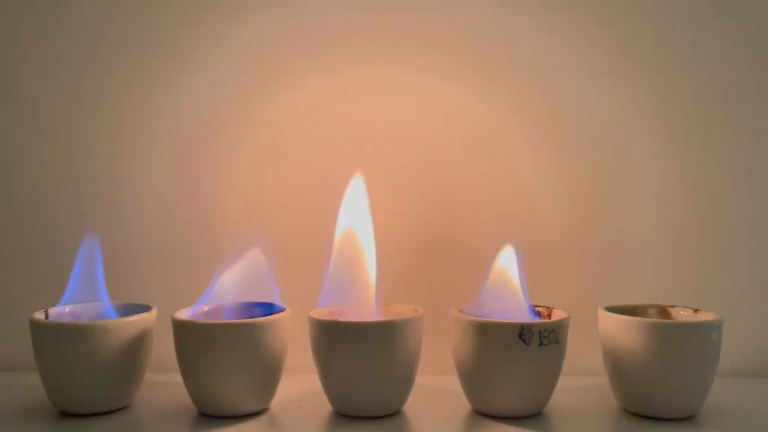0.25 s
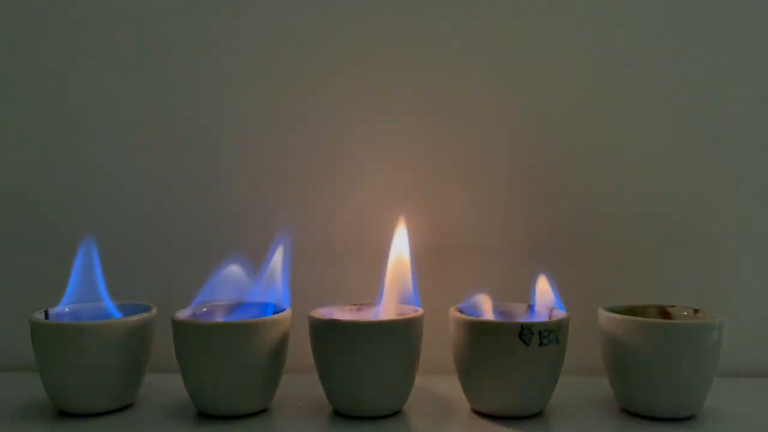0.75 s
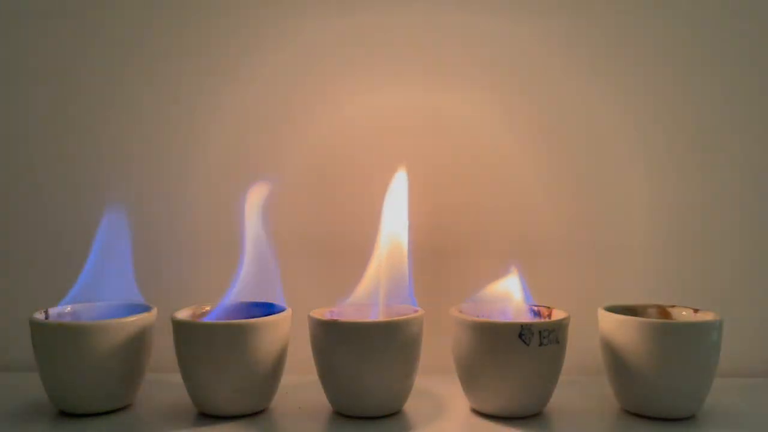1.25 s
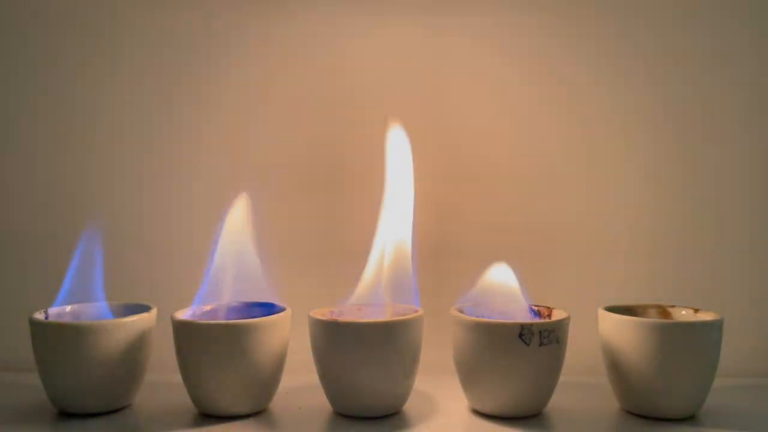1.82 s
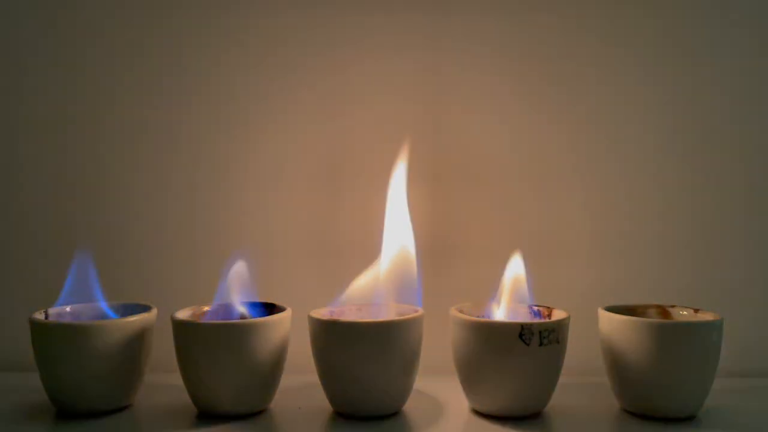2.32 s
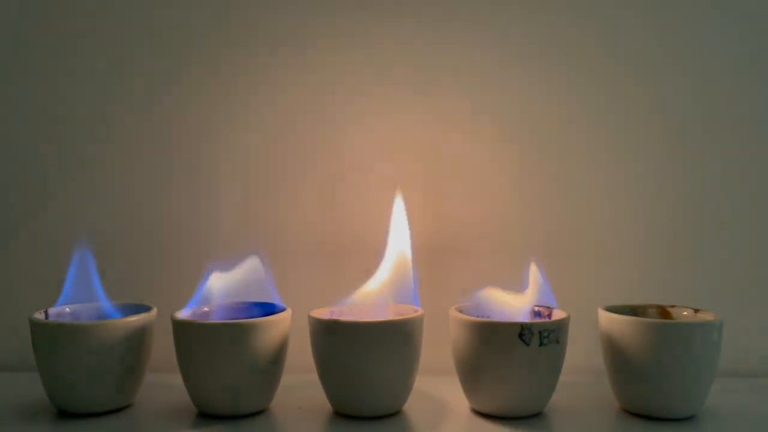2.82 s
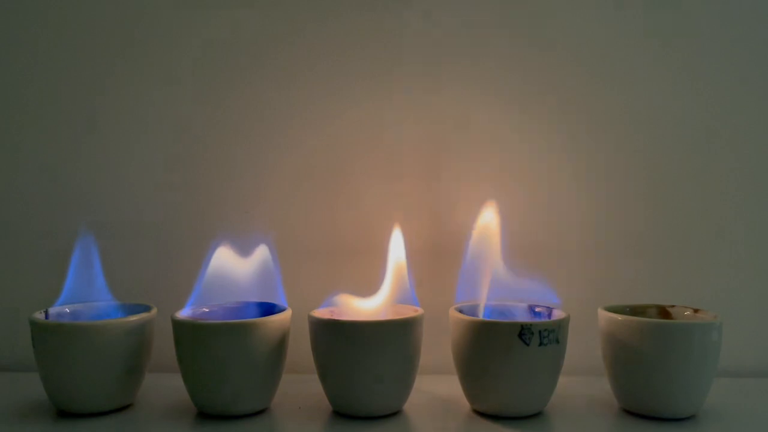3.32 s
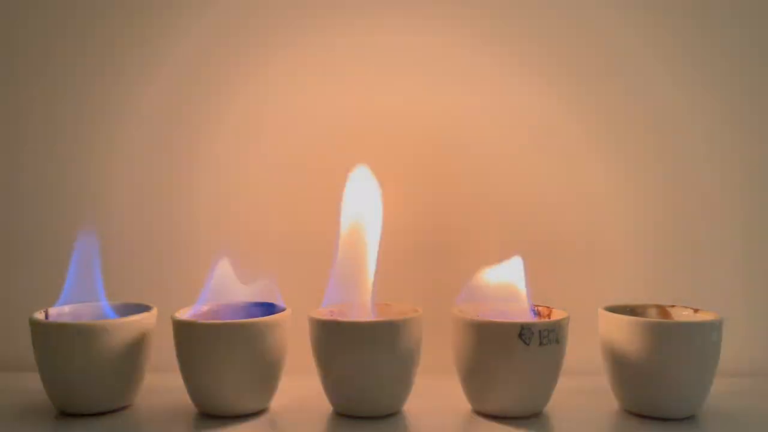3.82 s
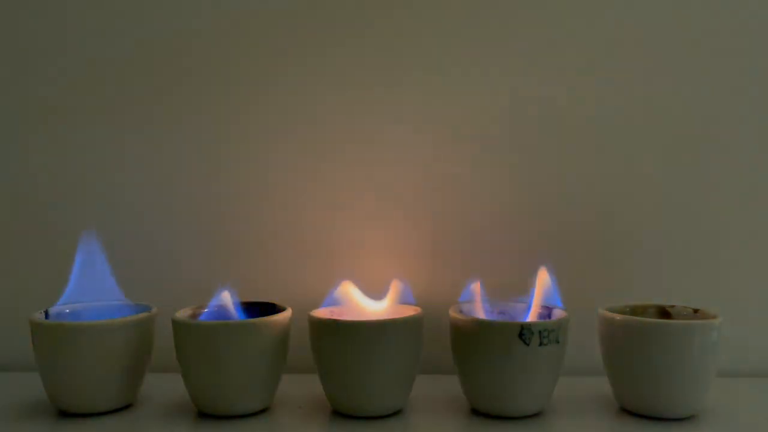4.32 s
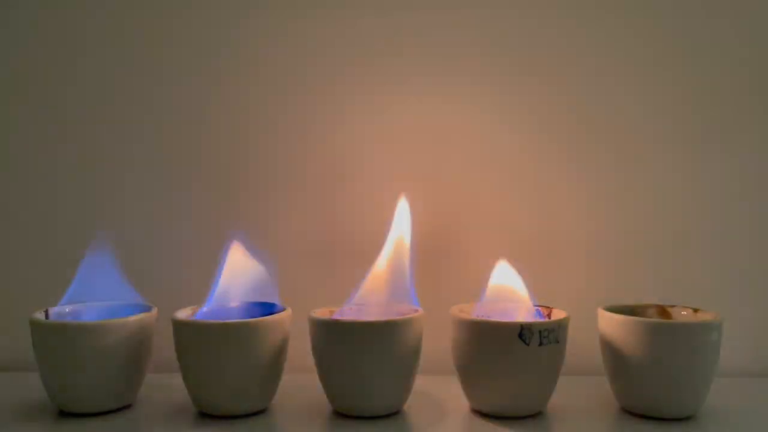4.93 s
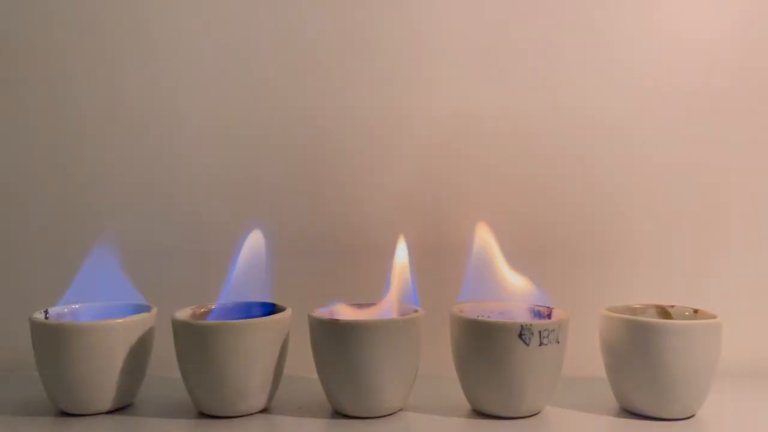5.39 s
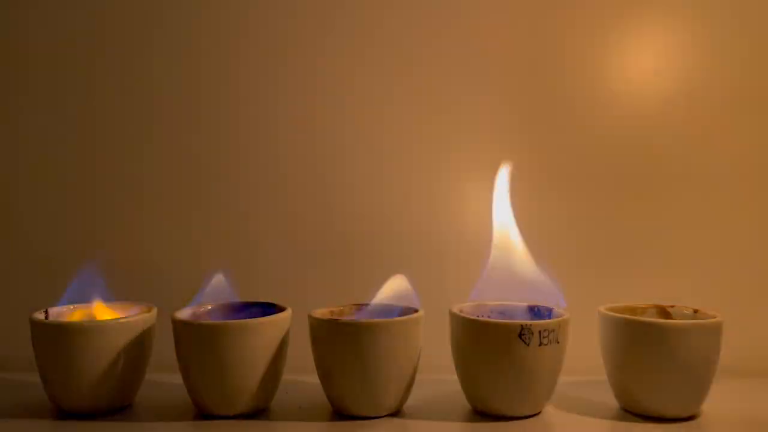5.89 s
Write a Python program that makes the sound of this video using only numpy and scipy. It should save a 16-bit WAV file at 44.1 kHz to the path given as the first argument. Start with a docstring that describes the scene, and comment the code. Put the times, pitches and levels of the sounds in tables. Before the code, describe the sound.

In a quiet lab with a deep steady fan hum, matchsticks rattle and tick in their box for about four seconds, busy at first, then gentler. The cardboard drawer rubs closed, its hollow tone falling. One very short scrape turns into a bright, explosive ignition, then a fine fading hiss with sputters and a soft flame rush. Light box clicks end it. Close stereo microphones, short room echo.

```python
"""In a room where ventilation hums, fingers rummage in a cardboard matchbox, a little to the right over a bench.
The sticks rustle and click: shaped noise rings the wood and the card. Then the drawer is pushed shut in fine jerks.
One match scrapes over the striker, catches with a sharp burst and flares for most of a second:
noise and random grains make its hiss, crackle and rush, and wavering tones over steady noise make the hum."""
import sys
import numpy as np
from scipy import signal
from scipy.fft import rfft, irfft, next_fast_len
from scipy.io import wavfile
from scipy.ndimage import uniform_filter1d, map_coordinates

SR = 44100
rng = np.random.default_rng(int(sys.argv[2]) if len(sys.argv) > 2 else 0)


def master_out(mix):
    """Clip the mix to full scale and print it as 16-bit PCM to the path in sys.argv[1]."""
    frames = np.transpose(np.atleast_2d(mix))
    ceiling = np.clip(frames, -1, 1)
    pcm = np.round(ceiling * 32767).astype(np.int16)
    wavfile.write(sys.argv[1], SR, pcm)


N = 271215
TIME_S = np.arange(N) / SR

# Levels in the tables are relative: the functions may add mixing gains.
# A t60 is the time a sound takes to fade by 60 dB.

# Sticks knocking on each other or on the box; hard knocks tick, soft ones ring the box:
# time_s, level_db, hardness_db
CLICKS = [(0.075, -46.5, -13), (0.163, -41, -9), (0.188, -38, -4), (0.197, -41, -1), (0.242, -45, 2),
          (0.2586, -41, -7), (0.314, -47, 10), (0.3238, -38, -4), (0.434, -41, 1), (0.545, -45.5, 2),
          (0.5572, -30, 5), (0.5734, -44, 12), (0.6674, -49.5, -4), (0.7191, -37, 0), (0.729, -41.5, 5),
          (0.7728, -49, -10), (0.8704, -44.5, -12), (0.9248, -47, -1), (0.9429, -37.5, -11),
          (0.952, -41, 6), (0.961, -48, -4), (1.027, -37, -6.5), (1.0437, -43, -4), (1.067, -45.5, -3),
          (1.1218, -40.5, 16), (1.1401, -44, 10), (1.2025, -40.5, 2), (1.232, -38, -2), (1.287, -48, 0),
          (1.323, -38, -6), (1.3348, -38, 15), (1.3588, -41.5, 5), (1.447, -45.5, -8), (1.541, -42.5, 7),
          (1.569, -46.5, -6), (1.664, -44, 4), (1.687, -30, -3.5), (1.725, -40, -1), (1.904, -46, -11),
          (1.9153, -31.5, 3.5), (1.9606, -49, 6), (2.0175, -55, -18), (2.1926, -45.5, -19),
          (2.3549, -29.5, 0), (2.4777, -46.5, -12), (2.554, -48, 5.5), (2.644, -49, 11), (2.849, -47, 0),
          (2.945, -54, -9), (3.03, -52, 10), (3.274, -49.5, -19), (3.586, -48, -4), (3.6374, -39, -2),
          (3.6487, -38, 0), (3.826, -50.5, -20), (3.8517, -40, -12), (3.903, -48, -4), (4.007, -51, -10),
          (4.063, -39, -14.5), (4.11, -45, -1), (4.3926, -46, -15), (4.4213, -54.5, -20),
          (4.4516, -52.5, -10), (4.495, -52.5, -15), (4.562, -43, -13.5), (4.605, -48.5, -15.5),
          (4.6233, -58, -15), (4.862, -63.5, -22), (4.9318, -53.5, -11), (5.7894, -44, -11),
          (5.818, -36.5, -7), (5.829, -36.5, -15), (5.8499, -44, -16), (5.8624, -43, -10),
          (5.907, -46.5, -8), (5.9333, -57, -26)]
# Finger strokes that slide the sticks over each other: peak_time_s, level_db, t60_s
STROKES = [(0.02, -47.5, 0.53), (0.191, -38.5, 0.23), (0.265, -47, 0.2), (0.554, -45.5, 0.29),
           (0.78, -51, 1.2), (0.935, -55.5, 0.46), (1.125, -46.5, 0.35), (1.239, -46, 0.13),
           (1.332, -44.5, 0.2), (1.702, -43, 0.29), (1.82, -55, 0.76), (1.929, -53.5, 0.41),
           (2.189, -40.5, 0.23), (2.4, -53, 0.52), (2.659, -48, 0.18), (2.868, -48, 0.14),
           (2.998, -55, 0.37), (3.27, -56.5, 1.96), (3.659, -48.5, 0.17), (3.87, -51.5, 0.62),
           (4.584, -58, 0.18), (4.949, -57.5, 0.058)]
STROKE_RISE = 0.12  # rise time of a stroke as a share of its t60
# Between strokes the fingers keep moving, ever more gently
SEARCH_END_S, SEARCH_DB, CALM_DB_PER_S = 4.0, -53.5, 9
# Moments when the fingers pause: time_s
RESTS = [0.64, 2.102, 2.31, 2.781, 3.11, 3.733]
REST_S, REST_DB = 0.036, -10.5  # half length and level drop of a pause
# Colour of the wooden sticks: pitch_hz, level_db_per_hz
STICKS = [(200, -31), (650, -1.5), (1200, 2.5), (2800, -6.5), (4500, 2.5), (6500, 2.5), (9000, -6.5),
          (12000, -26), (13500, -37)]
# Colour of the hard edge of a stick: pitch_hz, level_db_per_hz
TICK = [(3000, -19.5), (6500, -2.5), (8500, -1.5), (10000, 3.5), (11700, -4.5), (13200, -36.5),
        (16000, -43)]
# Resonances of the open cardboard box: pitch_hz, width_hz, level_db
BOX = [(1558, 188, 2.5), (1966, 270, 7), (2924, 386, -7)]
# The same box once closed: pitch_hz, width_hz, level_db
SHUT_BOX = [(1405, 130, 3), (2110, 180, -2), (2660, 120, -4), (3490, 150, -8)]
SHUT_S = 4.36  # the drawer is nearly home
# The box wall flexing under a firm finger: pitch_hz, width_hz, level_db
WALL = [(700, 520, 0)]
# Pushes that close the drawer: start_s, length_s, level_db, peak_place (0 to 1)
PUSHES = [(3.996, 0.14, -42.5, 0.44), (4.063, 0.39, -47.5, 0.7)]
# Colour of the sliding drawer: pitch_hz, level_db_per_hz
DRAWER = [(290, -45), (500, -15), (740, -6), (1200, -16), (1440, 3), (1750, -15), (2100, 4), (2380, -9),
          (2740, -4), (3110, -10), (4790, -9), (11700, -15.5), (14000, -69)]
# Air resonance of the closing box: time_s, pitch_hz, level_db
SLEEVE = [(4, 2170, -49.5), (4.068, 2038, -37.5), (4.13, 1886, -69), (4.23, 1562, -63), (4.33, 1437, -48),
          (4.42, 1400, -53), (4.461, 1420, -74)]
# Fingers rubbing on the shut box: time_s, level_db
GRIP = [(5.68, -62), (5.75, -50.5), (5.83, -47.5), (5.9, -50), (5.95, -73)]
# The drawer breaks loose
SQUEAK_S, SQUEAK_LENGTH_S, SQUEAK_DB, SQUEAK_HZ, SQUEAK_WIDTH_HZ = 4.004, 0.079, -42.5, 4950, 650

# The match head on the striker: time_s, level_db, rise_s, t60_s, burning_share (0 to 1)
STRIKE = [(5.117, -26, 0.0015, 0.02, 0), (5.122, -15, 0.0012, 0.016, 0.02),
          (5.135, -16.5, 0.0013, 0.03, 0.5), (5.147, -11, 0.0021, 0.015, 0.93),
          (5.151, -14, 0.00053, 0.078, 0.96), (5.1524, -8.5, 0.0003, 0.0071, 1)]
# Colour of the scrape: pitch_hz, level_db_per_hz
STRIKER = [(240, -38.5), (400, -15), (715, -16.5), (1000, 7.5), (1200, 9), (2090, 4), (3020, -12),
           (3670, -6), (6180, -29), (11000, -12), (14000, -66.5)]
# Colour of the burst as the head catches: pitch_hz, level_db_per_hz
IGNITION = [(150, -17.5), (360, 1), (800, 3), (1150, 5.5), (1500, -8.5), (2100, 4), (3000, -5), (5500, 1),
            (8000, -2.5), (9300, 3.5), (11200, 9.5), (13000, -15), (16000, -30)]
# Colour of the expanding gas: pitch_hz, level_db_per_hz
PUFF = [(45, -18), (140, -1), (400, 0.5), (1200, -28.5)]
# The head flares in two surges: peak_time_s, hiss_db, flame_db, rise_s, t60_s
SURGES = [(5.22, -43.5, -58, 0.024, 2.4), (5.67, -43.5, -48, 0.12, 1.15)]
BURNOUT_S, BURNOUT_T60_S = 5.82, 0.54  # the head is spent and the flare dies
# Colour of the gas hiss: pitch_hz, level_db_per_hz
HISS = [(1000, -4.5), (3500, -4.5), (5200, 4), (7000, 3), (9000, 4), (11200, 10.5), (12500, -4.5),
        (13500, -44.5), (16000, -57.5)]
# The hiss sinks as the flame spreads over the head: time_s, centre_hz
JET = [(5.2, 10780), (5.45, 10300), (5.601, 8340), (5.85, 8340)]
# Colour of the rushing flame: pitch_hz, level_db_per_hz
FLAME = [(120, -10), (290, 1.5), (500, 1.5), (750, -7), (1200, -8), (3000, -32)]
# The head crackling: time_s, level_db
SPUTTER = [(5.2, -55), (5.43, -52), (5.52, -56), (5.65, -48.5), (5.8, -49), (5.96, -80)]
# Larger crumbs of the head bursting: time_s, level_db
POPS = [(5.262, -54), (5.308, -48), (5.432, -40.5)]
# Colour of the crackle: pitch_hz, level_db_per_hz
CRACKLE = [(600, -8.5), (1000, 3), (2100, 10.5), (2700, -5), (3500, -12), (9000, -28)]

# Fan and mains tones: pitch_hz, level_db, width_hz
HUM = [(69.9, -46.5, 2.5), (93.9, -49, 5), (156.3, -64, 5), (201.6, -69, 0)]
# Colour of the duct rumble: pitch_hz, level_db_per_hz
DUCT = [(20, -37.5), (32, -16.5), (54, -2.5), (77, -3), (102, -0.5), (129, -9), (162, -12), (269, -23.5),
        (301, -26), (500, -91.5)]
# Colour of the faint air noise: pitch_hz, level_db_per_hz
AIR = [(150, -9), (250, -5.5), (448, -9), (569, -16), (687, -14), (1150, -20), (1820, -24), (3880, -41),
       (10100, -36), (15000, -60)]
# Quick reflections from the bench: pitch_hz, t60_s
BENCH = [(300, 0.048), (2000, 0.044), (10000, 0.031)]
# Echo of the room: pitch_hz, t60_s
ROOM = [(200, 0.38), (1500, 0.29), (5000, 0.21), (12000, 0.11)]
# How the microphones differ in colour: pitch_hz, left_minus_right_db
TILT = [(100, 1), (300, 2.5), (750, -4), (1300, 0), (2400, 0.5), (4800, 5), (8000, 0.5), (14000, -0.5)]
# In the treble the microphones agree at this pitch, and again after each turn
PORT_HZ, PORT_TURN_HZ = 8366, 3460
TOP_HZ = 15900  # upper limit of the sound


def stirring():
    """How fast the sticks slide: strokes swell and settle over a light search that calms down, with short rests."""
    search = amp(SEARCH_DB - CALM_DB_PER_S * TIME_S) * (TIME_S < SEARCH_END_S)
    pauses = sum(np.exp(-((TIME_S - s) / REST_S) ** 2) for s in RESTS)
    power = search ** 2
    for s, db, t60 in STROKES:
        power += (amp(db) * blow(s, STROKE_RISE * t60, t60)) ** 2
    return amp(REST_DB * pauses) * np.sqrt(power)


def light_knocks(stir, count=24, over_db=-5, scatter_db=-0.5, hardness_db=-5):
    """Loose sticks tumble at random while stirred: rows of time_s, level_db, hardness_db."""
    times = (np.arange(count) + rng.random(count)) * SEARCH_END_S / count
    stir_db = 20 * np.log10(stir[(times * SR).astype(int)] + 1e-9)
    knock_db = stir_db + over_db + scatter_db * rng.standard_normal(count)
    return [(s, db, hardness_db) for s, db in zip(times, knock_db)]


def clicks(stir, swell=0.00078, t60=0.015, settle_db=-17, stick_db=3.5, ring_db=4, tick_db=3.0):
    """A stick snaps against another and its neighbours chatter; the box rings along, less so on hard contact."""
    t = np.arange(-SR // 16, SR // 8) / SR
    settle = (t > 0) * amp(-60 * abs(t) / 0.12)
    snap = np.exp(np.minimum(t / swell, -np.log(1000) * t / t60))
    wood, card, edge = np.zeros((3, N + SR))
    for s, db, hardness_db in light_knocks(stir) + CLICKS:
        chatter = unit(rng.standard_normal(len(t)) ** 5)  # the fifth power leaves sparse spikes
        knock = amp(db) * (snap * rng.standard_normal(len(t)) + amp(settle_db) * settle * chatter)
        at = round(s * SR) + np.round(t * SR).astype(int)
        wood[at] += amp(stick_db) * knock
        card[at] += amp(ring_db - hardness_db / 2) * knock
        edge[at] += amp(tick_db + hardness_db / 2) * knock
    shut = TIME_S > SHUT_S
    ring = open_box(card[:N] * ~shut) + box(card[:N] * shut, SHUT_BOX)
    return shifting(coloured(wood[:N], STICKS) + ring + coloured(edge[:N], TICK))


def rummage(stir, stick_db=-2, ring_db=-0.5, tick_db=-7, wall_db=-17, firm_db=-50, hardness=0.16):
    """Sticks rub and tick in clumps; firm stirring is bright and flexes the wall, gentle leaves mostly the box."""
    force = stir / amp(firm_db) + 1e-3
    bright = force ** hardness
    clumps = unit(amp(2.5 * wobble(150)))
    rub = stir * clumps * grains(rate=750, spread_db=3.5, smooth=0.28)
    wood = amp(stick_db) * coloured(rub, STICKS)
    ticks = amp(tick_db) * coloured(rub * bright, TICK)
    ring = amp(ring_db) * open_box(rub / bright)
    wall = amp(wall_db) * box(rub * force, WALL)
    return shifting(wood + ticks + ring + wall)


def drawer(rub_db=1, width_hz=170):
    """Cardboard squeaks loose and slips in jerks; its air rings lower as it closes, then fingers rub the shut box."""
    jerks = unit(amp(1.2 * wobble(130)))
    push = jerks * sum(amp(db) * arch(start, length, peak) for start, length, db, peak in PUSHES)
    rub = coloured(push * grains(rate=2000, spread_db=2, smooth=0.19), DRAWER)
    times, air_hz, air_db = np.transpose(SLEEVE)
    air_tone = narrow(np.interp(TIME_S, times, air_hz), width_hz)
    air = jerks * level_curve(np.c_[times, air_db]) * air_tone
    squeak_push = amp(SQUEAK_DB) * jerks * arch(SQUEAK_S, SQUEAK_LENGTH_S, peak=0.2)
    squeak = squeak_push * narrow(SQUEAK_HZ, SQUEAK_WIDTH_HZ)
    grip = box(jerks * level_curve(GRIP) * rng.standard_normal(N), SHUT_BOX)
    return amp(rub_db) * shifting(rub) + air + grip + squeak


def arch(start, length, peak):
    """Speed of one push: up from rest and back to rest, fastest at the given share of its length."""
    progress = np.clip((TIME_S - start) / length, 0, 1)
    return np.sin(np.pi * progress ** (np.log(0.5) / np.log(np.clip(peak, 0.1, 0.9))))


def open_box(x, drift=0.075, rate=11):
    """Fingers cover the opening more or less, so the box rings a little higher or lower from knock to knock."""
    cover = np.clip(wobble(rate), -1, 1)
    ring = np.zeros(N)
    for k in (-1, 0, 1):  # crossfade between three tunings
        share = np.sqrt(np.maximum(1 - abs(cover - k), 0))
        ring += box(x * share, np.multiply(BOX, [1 - k * drift, 1, 1]))
    return ring


def box(x, body):
    """x through the resonances of the cardboard, at unit energy."""
    def modes(f):
        total = 0
        for k, (centre, width, db) in enumerate(body):
            mode = 1j * f * width / (centre * centre - f * f + 1j * f * width)
            total = total + (-1) ** k * amp(db) * mode  # neighbours alternate in sign
        return total

    def response(f):
        ring = modes(f)
        return ring / np.sqrt(np.mean(abs(ring) ** 2))

    return filtered(x, response)


def strike():
    """The head scrapes dully on the box side, then grit ignites and the burst turns broad and bright."""
    scrape, burst = np.zeros(N), np.zeros(N)
    for s, db, rise, t60, burning_share in STRIKE:
        push = amp(db) * blow(s, rise, t60)
        scrape += np.sqrt(1 - burning_share) * push
        burst += np.sqrt(burning_share) * push
    grit = coloured(scrape * rng.standard_normal(N), STRIKER)
    fire = coloured(burst * grains(rate=7600, spread_db=2.5, smooth=0.54), IGNITION)
    return grit + fire


def puff(at=5.154, db=-25.0, rise=0.0057, t60=0.085):
    """Hot gas pushes the air aside just after the head catches."""
    return coloured(amp(db) * blow(at, rise, t60) * rng.standard_normal(N), PUFF)


def burning():
    """Strength of the gas jet and of the flame: each surge swells and sinks until the head is spent."""
    fuel = amp(-60 * np.maximum(TIME_S - BURNOUT_S, 0) / BURNOUT_T60_S)
    power = np.zeros((2, N))
    for s, hiss_db, flame_db, rise, t60 in SURGES:
        power += (amp([[hiss_db], [flame_db]]) * blow(s, rise, t60)) ** 2
    return fuel * np.sqrt(power)


def flare(hiss_db=-1, flame_db=1.0, jet_db=-3.5, jet_width_hz=1200):
    """Gas jets from the head: a fine hiss with a sinking centre, dense sputter, a few pops and a fluttering rush."""
    jet, flame = burning()
    jet = jet * amp(0.5 * wobble(63))
    hiss = coloured(jet * grains(rate=10000, spread_db=4.5, smooth=1.0), HISS)
    centre = jet * narrow(np.interp(TIME_S, *np.transpose(JET)), jet_width_hz)
    rush = coloured(flame * amp(1.8 * wobble(30)) * rng.standard_normal(N), FLAME)
    pops = sum(amp(db) * blow(s, rise=0.001, t60=0.044) for s, db in POPS)
    crumbs = (level_curve(SPUTTER) + pops) * grains(rate=2500, spread_db=7.5, smooth=0.57)
    sputter = shifting(coloured(crumbs, CRACKLE))
    return amp(hiss_db) * hiss + amp(jet_db) * centre + amp(flame_db) * rush + sputter


def ventilation(duct_db=-49, air_db=-62):
    """Wavering fan tones and steady mains hum over duct rumble and faint air noise."""
    hum = sum(amp(db) * narrow(hz, width) for hz, db, width in HUM)
    duct = amp(duct_db) * stereo_noise(DUCT, side_db=-13.5)
    air = amp(air_db) * stereo_noise(AIR, side_db=-5.0)
    return hum + duct + air


def stereo_noise(spectrum, side_db):
    """Steady noise of rms 1, partly unlike in the two channels."""
    mid, side = filtered(rng.standard_normal((2, N)), lambda hz: amp(along(spectrum, hz)))
    return unit(np.array([mid + amp(side_db) * side, mid - amp(side_db) * side]))


def space(x, lag_ms, direct_db, bench_db, room_db, count=5):
    """Sound reaches the right first; the bench answers at once, differently as the hands move, the room later."""
    half_lag = np.array([[-1j], [1j]]) * np.pi * lag_ms / 1e3  # left late, right early
    heard = amp(direct_db) * filtered(x, lambda hz: np.exp(half_lag * hz))
    places = np.array([wobble(6) for _ in range(count)])
    places /= np.linalg.norm(places, axis=0)
    for share in places:
        answer = amp(bench_db) * echoes(BENCH) + amp(room_db) * echoes(ROOM)
        heard = heard + signal.oaconvolve((x * share)[None], answer, axes=1)[:, :N]
    return heard


def echoes(t60s):
    """A stereo tail of unit energy, each frequency dying at its own speed."""
    hz, t, z = signal.stft(rng.standard_normal((2, SR // 2)), SR, nperseg=128)
    fade = amp(-60 * t / along(t60s, hz)[:, None])
    tail = signal.istft(z * fade, SR, nperseg=128)[1]
    return tail / np.linalg.norm(tail, axis=1, keepdims=True)


def ports(x):
    """In the high treble both microphones carry the same sound, at a phase that turns with pitch."""
    def share(hz):
        return np.interp(hz, [6500, 8000], [0, 1])

    def turned(hz):
        return np.sqrt(share(hz)) * np.exp(2j * np.pi * (hz - PORT_HZ) / PORT_TURN_HZ)

    left, right = x
    own = filtered(right, lambda hz: np.sqrt(1 - share(hz)))
    return np.array([left, own + filtered(left, turned)])


def amp(db):
    """Decibels to gain."""
    return 10 ** (np.asarray(db) / 20)


def unit(x):
    """Scaled to rms 1."""
    return x / np.sqrt(np.mean(x ** 2) + 1e-20)


def along(points, hz):
    """Read a table of pitch_hz and value on a log pitch axis."""
    f, v = np.transpose(points)
    return np.interp(np.log(hz + 1), np.log(f + 1), v)


def level_curve(rows):
    """One gain per sample from time_s and level_db, silent outside the table."""
    s, db = np.transpose(rows)
    return amp(np.interp(TIME_S, s, db, left=-np.inf, right=-np.inf))


def blow(s, rise, t60):
    """Envelope that swells up to time s and then dies away."""
    t = TIME_S - s
    return np.exp(np.minimum(t / rise, -np.log(1000) * t / t60))


def wobble(rate):
    """A smooth random curve, rate knots a second."""
    knots = rng.standard_normal(int(N * rate / SR) + 4)
    return map_coordinates(knots, [np.arange(N) * rate / SR])


def grains(rate, spread_db, smooth):
    """Tiny contacts of random size, about rate a second, over a smooth rub, rms 1."""
    sizes = amp(spread_db * np.clip(rng.standard_normal(N), -2, 2)) * rng.choice([-1, 1], N)
    contacts = unit(sizes * (rng.random(N) < rate / SR))
    return unit(contacts + smooth * rng.standard_normal(N))


def narrow(hz, width_hz):
    """A tone of rms 1 whose level and phase waver over the given width."""
    waver = wobble(2 * width_hz) + 1j * wobble(2 * width_hz)
    turns = np.cumsum(hz * np.ones(N)) / SR
    return unit(np.real(waver * np.exp(2j * np.pi * turns)))


def filtered(x, response):
    """x times a complex response of frequency."""
    m = next_fast_len(N + SR // 2)
    return irfft(rfft(x, m) * response(np.fft.rfftfreq(m, 1 / SR)), m)[..., :N]


def coloured(x, spectrum, size=8192):
    """x through a causal filter of unit energy with the given colour."""
    cepstrum = irfft(np.log(amp(along(spectrum, np.fft.rfftfreq(size, 1 / SR)))))
    cepstrum[1:size // 2] *= 2  # fold to one side, so the filter rings only after the sound
    cepstrum[size // 2 + 1:] = 0
    ring = irfft(np.exp(rfft(cepstrum)))
    return signal.fftconvolve(x, ring / np.linalg.norm(ring))[:N]


def shifting(x, size=256):
    """x with a colour that keeps changing, as the sound comes from one spot after another."""
    z = signal.stft(x, nperseg=size)[2]
    field = uniform_filter1d(rng.standard_normal(z.shape), size=3, axis=0)
    field = uniform_filter1d(field, size=4, axis=1)
    gain = unit(amp(2.6 * unit(field)))
    return signal.istft(z * gain, nperseg=size)[1][:N]


def scene():
    """The box is held to the right, the match nearer the middle, in the humming room."""
    room_db = -15
    stir = stirring()
    box_sound = clicks(stir) + rummage(stir) + drawer()
    matchbox = space(box_sound, lag_ms=0.325, direct_db=-4.5, bench_db=-3.0, room_db=room_db)
    match_sound = strike() + puff() + flare()
    match = space(match_sound, lag_ms=0.28, direct_db=-1.5, bench_db=-2.0, room_db=room_db)
    return matchbox + match + ventilation()


def record(dry):
    """The two microphones differ in colour and phase; the sound clips at full scale and is band-limited."""
    sides = np.array([[0.5], [-0.5]])  # half the difference to each side
    heard = filtered(ports(dry), lambda hz: amp(sides * along(TILT, hz)))
    return filtered(np.clip(heard, -1, 1), lambda hz: 1 / (1 + (hz / TOP_HZ) ** 60))


dry = scene()
out = record(dry)
master_out(out)
```